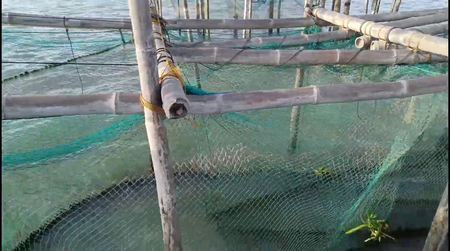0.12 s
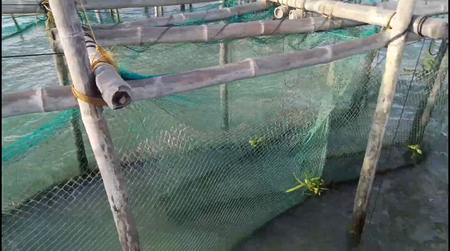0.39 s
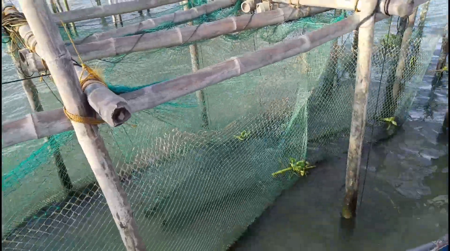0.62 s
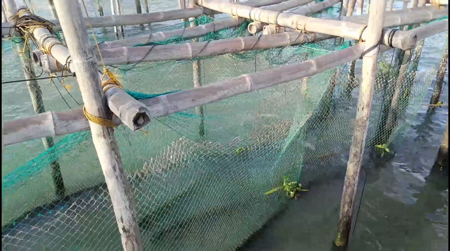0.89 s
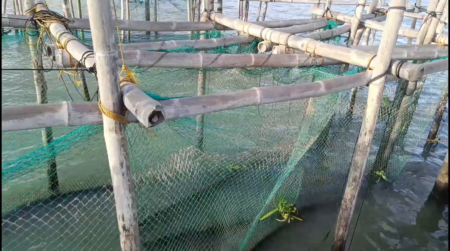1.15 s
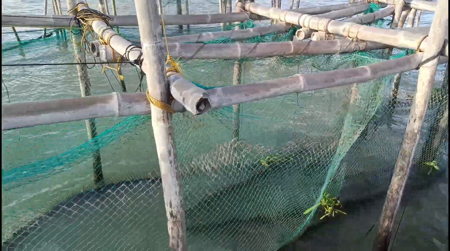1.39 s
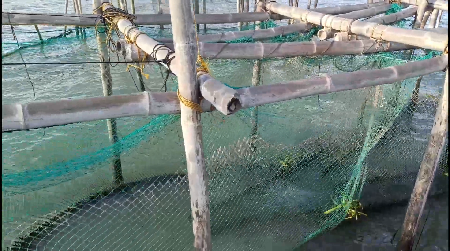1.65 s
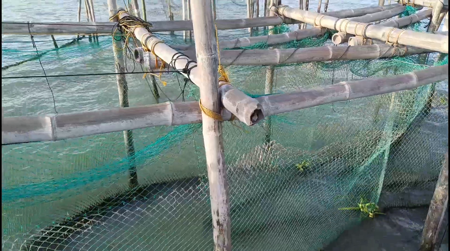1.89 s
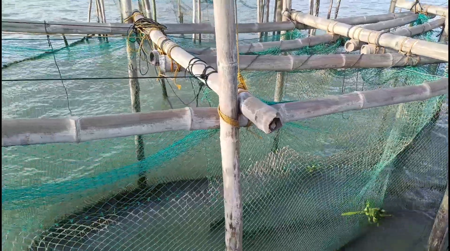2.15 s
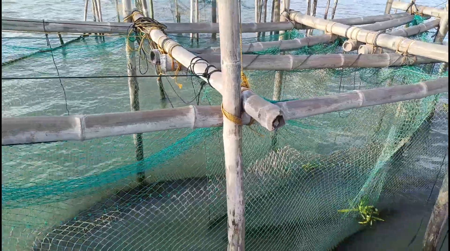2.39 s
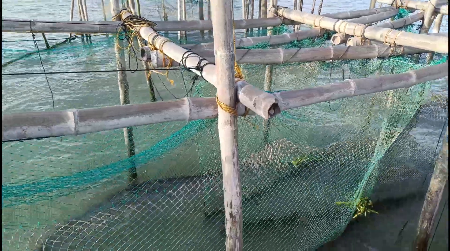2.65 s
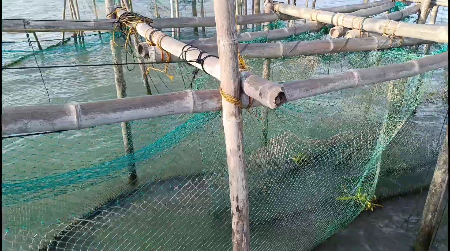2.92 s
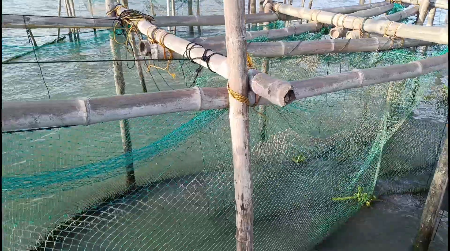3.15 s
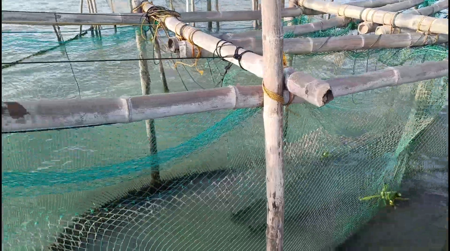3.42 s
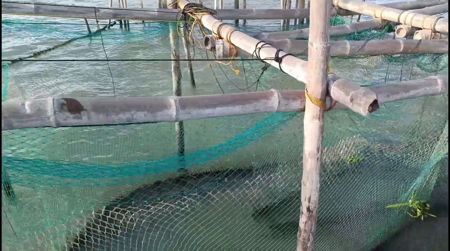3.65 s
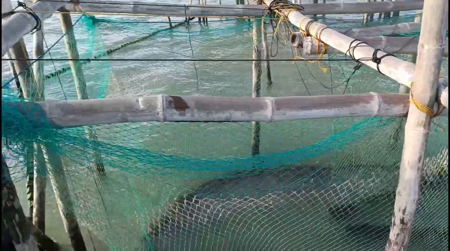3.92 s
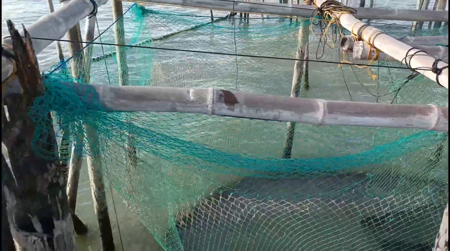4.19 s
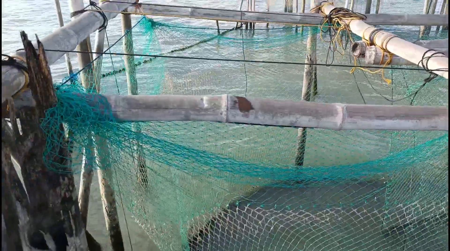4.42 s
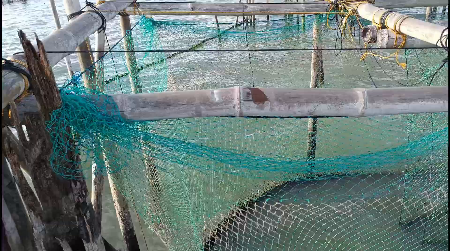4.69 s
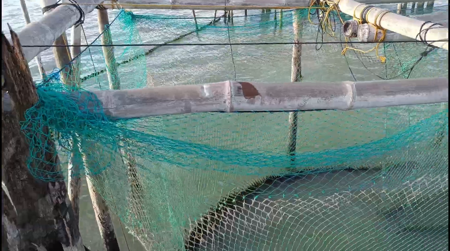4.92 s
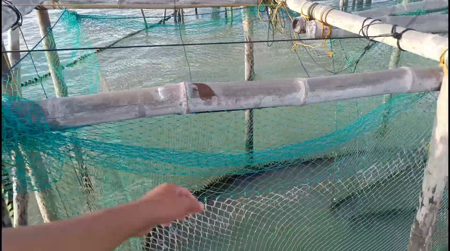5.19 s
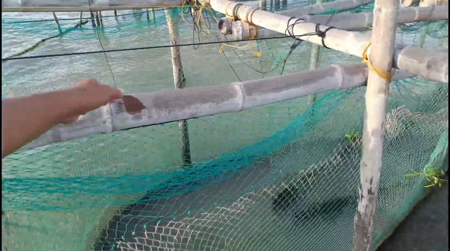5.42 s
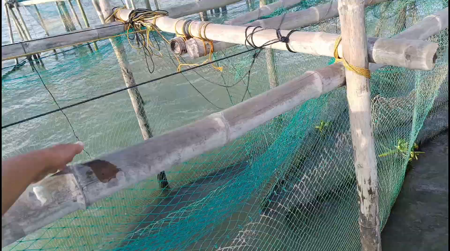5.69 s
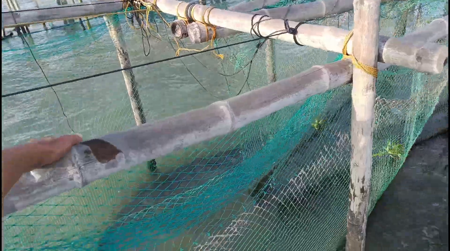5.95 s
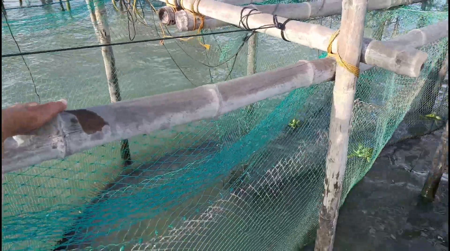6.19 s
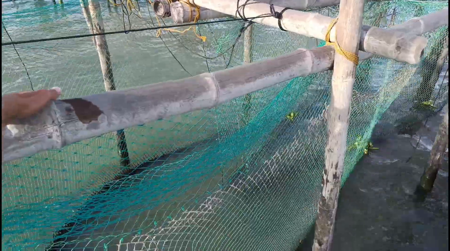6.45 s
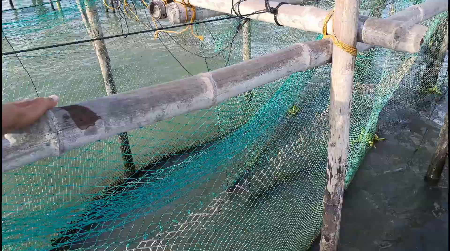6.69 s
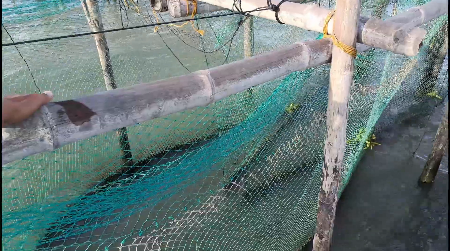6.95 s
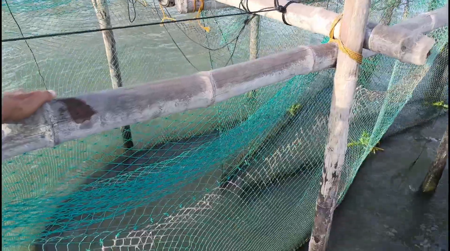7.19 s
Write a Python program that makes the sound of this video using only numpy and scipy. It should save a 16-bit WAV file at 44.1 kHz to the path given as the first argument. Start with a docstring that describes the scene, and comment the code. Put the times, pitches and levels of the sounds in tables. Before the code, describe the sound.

Soft sloshing and bubbling grows into busy splashes and hard hollow knocks on a small hull, with wind buffeting a hand-held phone.

```python
"""Water around a moored boat

Water sloshes, sprays and slaps around a small boat tied among bamboo poles: shaped noise and damped bubble tones.
Gear knocks on the hull and a loose steel fitting rings, both as sums of decaying modes; rubs are comb-filtered hiss.
Wind buffets the two microphone ports of a hand-held phone, the left one more, as low noise unrelated between ports.
Behind it lies the even wash of the open lake. Short, ever changing echoes surround the knocks and splashes."""
import sys
import numpy as np
from scipy import signal
from scipy.fft import rfft, irfft, next_fast_len
from scipy.io import wavfile
from scipy.ndimage import uniform_filter1d, map_coordinates

SR = 44100
rng = np.random.default_rng(int(sys.argv[2]) if len(sys.argv) > 2 else 0)


def undo_db(level):
    """Turn decibels back into plain size, where 20 dB means ten times bigger."""
    steps = np.asarray(level, float) / 20
    return 10 ** steps


def transcribe(signal):
    """Save signal, clipped to [-1, 1], as a 16-bit WAV file at the path in sys.argv[1]."""
    frames = np.atleast_2d(signal).T
    limited = np.clip(frames, -1, 1)
    pcm = np.round(limited * 32767).astype(np.int16)
    wavfile.write(sys.argv[1], SR, pcm)


N = 323253  # length [samples]

# Levels are source levels, ahead of the echoes and the colour of the ports.
# spells when the water works on the left: (start [s], end [s], lead of the left port [samples])
LEFT_SPELLS = [(.3, .45, 12), (2.55, 2.66, 16), (2.78, 2.92, 12), (3.35, 3.7, 16), (4.75, 5.03, 12),
               (5.37, 5.95, 17), (6.5, 6.6, 13), (6.6, 7.1, 10)]
# wavelets working against hull and poles: (start [s], hold [s], slosh level [dB], spray level [dB])
SURGES = [(.0, 0.13, -64, -68.5), (0.366, 0.063, -54, -58.5), (0.54, 0.0077, -83, -65),
          (1.06, 0.03, -66, -68), (1.17, 0.099, -55, -57), (1.22, 0.0078, -62, -48),
          (1.374, 0.056, -53.5, -53), (1.44, 0.34, -65, -69), (2.297, 0.097, -60.5, -67),
          (2.492, 0.0093, -54.5, -63), (2.637, 0.041, -51, -39), (2.712, 0.11, -47.5, -47),
          (2.838, 0.014, -37.5, -50), (2.9, 0.052, -58, -59.5), (2.97, 0.055, -47.5, -49),
          (3.163, 0.035, -50.5, -55), (3.406, 0.048, -60.5, -53), (3.476, 0.2, -61, -55),
          (3.636, 0.15, -55.5, -62), (4.218, 0.026, -56.5, -61), (4.277, 0.069, -69, -52),
          (4.383, 0.13, -48, -48.5), (4.533, 0.028, -32, -26.5), (4.63, 0.024, -31, -46),
          (4.788, 0.0082, -35.5, -35.5), (4.875, 0.017, -39.5, -41), (4.933, 0.019, -59, -38),
          (5.015, 0.026, -36.5, -44), (5.132, 0.28, -47.5, -48), (5.403, 0.012, -33, -45),
          (5.475, 0.013, -28, -38), (5.558, 0.064, -38.5, -45.5), (5.608, 0.016, -39, -37.5),
          (5.709, 0.14, -45.5, -54), (5.918, 0.73, -60.5, -62.5), (6.466, 0.014, -47.5, -65),
          (6.51, 0.054, -63, -45), (6.622, 0.014, -34.5, -73), (6.854, 0.092, -57.5, -63),
          (6.994, 0.012, -51.5, -53.5), (7.12, 0.0075, -54.5, -64.5)]
CALM_SLOSH_DB, CALM_SPRAY_DB = -71.5, -69  # lapping that never stops
SURGE_RISE_DB_S, SURGE_FALL_DB_S = 398.5, 231
# left over right [dB]: water on the right, on the left
SPRAY_PAN_DB, SLAP_PAN_DB = (3.5, 4.5), (0.5, 3.5)
# spectral shape of the slosh: (frequency [Hz], relative level [dB])
SLOSH_SPECTRUM = [(120, -23.5), (200, -8), (247, -8.5), (318, -4), (600, -7.5), (1030, -6.5), (1410, -6),
                  (1680, -10), (2400, -12), (3000, -35), (4000, -27.5), (5200, -16), (8800, -120)]
# spectral shape of the spray: (frequency [Hz], relative level [dB])
SPRAY_SPECTRUM = [(1500, -3.5), (2500, 1), (3200, 3), (5000, -4), (8000, 2), (12000, 0), (15500, 3),
                  (15800, -33), (16800, -46.5)]
# slaps and knocks: (time [s], level [dB], body [Hz], relative treble [dB], 60 dB decay before limits [s])
SLAPS = [(.224, -49.5, 523, -9, 0.11), (0.326, -43, 1160, -35, 0.058), (1.164, -39, 1090, 0, 0.062),
         (1.285, -45, 570, -4.5, 0.15), (1.451, -36.5, 1680, -15.5, 0.11), (1.587, -43.5, 980, -28, 0.1),
         (1.689, -48, 1980, -5.5, 0.24), (1.723, -49, 480, -6.5, 0.36), (2.101, -25.5, 1690, -48, 0.21),
         (2.125, -22.5, 450, -38, 0.19), (2.146, -30, 2600, -8.5, .12), (2.306, -44, 2100, -13, 0.084),
         (2.475, -42.5, 473, -7, 0.089), (2.538, -43.5, 1860, 1, 0.55), (2.783, -35.5, 1020, -4, 0.047),
         (2.839, -39.5, 460, -30, 0.54), (2.948, -41, 990, -28, 0.38), (3.075, -41.5, 1960, -6, 0.15),
         (3.13, -43, 1320, -11, 0.3), (3.387, -46.5, 1270, 0.5, 0.031), (3.741, -51, 1040, -37, 0.1),
         (3.969, -52, 770, -32, 0.092), (4.25, -41, 656, -9.5, 0.39), (4.384, -36, 690, -20, 0.24),
         (4.466, -22, 1780, -3, .06), (4.474, -16, 1800, 4, 0.076), (4.528, -19.5, 526, 1, 0.068),
         (4.625, -20, 1130, -6.5, 0.17), (4.769, -22.5, 990, 2.5, 0.025), (4.818, -33.5, 1060, -25.5, 0.18),
         (4.888, -26, 570, -11, 0.1), (4.987, -51, 467, 3, 0.041), (5.008, -20, 780, -17, 0.044),
         (5.125, -40, 829, -11, 0.023), (5.145, -48.5, 520, 8, 0.052), (5.231, -27.5, 1240, -3.5, 0.03),
         (5.255, -31.5, 2000, 1, 0.13), (5.38, -22, 1024, -16, 0.22), (5.558, -24.5, 590, -3, 0.018),
         (5.603, -25.5, 1510, -10, 0.054), (5.624, -16, 595, -6, 0.02), (5.658, -25.5, 1580, -12, 0.026),
         (5.747, -27.5, 1510, -9, 0.066), (5.816, -22.5, 1400, -14, 0.023), (5.851, -25, 450, -3, 0.013),
         (6.095, -39, 477, -9, 0.07), (6.104, -25.5, 464, -22.5, 0.018), (6.333, -39.5, 434, -7.5, 0.044),
         (6.372, -33.5, 617, -9, .15), (6.387, -23, 442, -17.5, 0.18), (6.494, -36, 450, -12.5, 0.16),
         (6.547, -9.5, 910, 1, 0.066), (6.621, -7, 1130, -18.5, 0.058), (6.878, -56, 450, -2, 0.06),
         (6.964, -42, 558, -25, 0.13), (7.013, -39.5, 762, 1, 0.061)]
# single large bubbles, and one thin high squeak:
# (time [s], level [dB], initial pitch [Hz], 60 dB decay before limits [s])
PLOPS = [(0.222, -45.5, 462, 0.059), (0.399, -45.5, 370, 0.11), (1.663, -26, 1207, 0.09),
         (1.71, -32.5, 497, 0.15), (1.744, -29.5, 462, 0.05), (1.754, -43, 613, 0.1),
         (2.138, -25, 500, 0.046), (2.165, -22, 342, 0.064), (2.19, -30, 305, 0.083),
         (2.59, -29.5, 295, 0.1), (2.81, -23, 404, 0.046), (2.859, -30, 330, 0.1),
         (2.965, -24.5, 1110, 0.04), (3.19, -31.5, 383, 0.062), (4.395, -29.5, 278, 0.22),
         (4.42, -34, 248, 0.058), (4.638, -13.5, 443, 0.068), (5.011, -15, 352, 0.062),
         (6.338, -20.5, 338, 0.033), (6.6212, -5, 962, 0.069), (6.6212, -8, 1080, 0.064),
         (6.371, -13, 366, 0.028), (0.051, -39.5, 470, 0.046), (.325, -51, 1090, 0.045),
         (1.18, -45, 1040, 0.036), (1.38, -39, 1210, .04), (1.84, -40, 480, 0.043),
         (2.625, -24.5, 383, 0.024), (2.915, -33, 330, 0.056), (7.09, -45.5, 616, 0.092),
         (7.285, -41.5, 592, 0.073), (3.253, -30, 1350, 0.034), (3.742, -21.5, 880, 0.042),
         (4.188, -30, 1125, 0.17), (4.384, -31.5, 316, 0.13), (5.623, -9, 626, 0.033),
         (5.853, -14.5, 415, 0.045), (6.564, -9.5, 388, 0.038), (6.579, -24, 453, 0.13),
         (6.82, -27.5, 450, 0.058), (1.0625, -50.5, 2570, 0.15), (1.2521, -48, 2000, 0.11),
         (1.4596, -37, 1900, 0.057), (1.6891, -35.5, 2150, 0.038), (2.0423, -39, 1780, 0.079),
         (2.2717, -39.5, 1620, 0.078), (4.7162, -25, 1540, 0.22), (4.9641, -20.5, 2040, 0.04),
         (5.0569, -21.5, 2140, 0.025), (5.4144, -27, 1690, 0.03), (6.5485, 1, 2310, 0.017),
         (6.8763, -30, 2080, 0.049), (3.6631, -37, 4430, 0.1), (.128, -42.5, 1780, .04),
         (.162, -48, 1700, .03), (.203, -47, 1300, 0.066), (.315, -41, 2250, 0.1), (.385, -53, 865, 0.055),
         (.41, -40, 1130, 0.063), (.832, -42, 1040, 0.04), (.89, -43, 1110, 0.054), (1.0, -46, 1680, .03),
         (1.755, -42, 1730, 0.085), (2.65, -42, 1040, .06), (2.705, -29, 1050, 0.073),
         (2.843, -27, 547, 0.044), (2.868, -30.5, 638, 0.077), (2.995, -22, 1130, 0.048),
         (3.075, -37, 1880, .04), (4.822, -21, 1117, 0.076), (5.01, -10.5, 2260, 0.022)]
# spray ticks: (time [s], level [dB], centre [Hz], left over right [dB])
TICKS = [(0.702, -54, 5150, -26), (1.1635, -38, 8400, -21), (1.216, -33, 9580, 18),
         (2.1247, -22.5, 3300, -9), (2.148, -21, 3700, 1), (6.5472, -11.5, 3430, 2.5),
         (6.621, -8.5, 3100, 7), (2.1455, -20.5, 6400, -1), (2.307, -44.5, 9700, 19),
         (3.4127, -30, 9400, 13), (4.286, -28.5, 8400, -1), (4.469, -5, 7600, 5), (4.633, -21, 2370, -6),
         (1.925, -58, 7000, -1), (2.7, -46, 13000, -5), (4.767, -22.5, 9300, 22), (5.0323, -32, 9480, 3),
         (5.048, -25.5, 9150, 6), (5.1279, -36, 9600, 16), (5.227, -25, 9860, 1), (5.2562, -37, 5240, -31),
         (5.322, -24, 8450, 7), (5.3903, -32, 8670, 18), (5.413, -19.5, 9400, 6), (5.4723, -21.5, 8900, -6),
         (5.571, -27, 9160, 5), (5.622, -14, 9800, 17), (5.71, -28.5, 9800, 13), (5.817, -52, 5290, -19),
         (5.849, -26, 10300, 19.5), (5.97, -35, 8300, 14.5), (6.105, -33, 9700, 6),
         (6.4825, -30, 5300, 0.5), (6.509, -26.5, 9600, 16), (6.546, -6, 8970, 9.5), (6.62, -15, 9350, 12),
         (6.9043, -32, 7300, 8.5), (7.014, -26.5, 9700, -3), (0.5054, -43.5, 4340, -3),
         (6.9045, -31, 3320, 17), (0.174, -45.5, 4100, 2), (0.55, -44.5, 5170, -10),
         (.658, -53, 4700, -2.5), (1.164, -32.5, 4500, -4), (2.32, -43, 7000, 3), (2.366, -44, 7140, 20),
         (5.413, -25, 3100, -18), (5.8515, -29, 3750, 12), (5.6235, -12, 4740, 6)]
# dry raps of gear on the hull: (time [s], level [dB])
RAPS = [(1.664, -33), (4.633, -20), (4.7685, -12.5), (4.822, -15.5), (4.888, -22), (5.0097, -18),
        (5.3815, -26), (5.5585, -17.5), (5.602, -17), (5.6235, -4), (5.658, -9.5), (5.749, -11),
        (5.8185, -7.5), (6.105, -19)]
# modes of the hull's short answer, before random spread: (frequency [Hz], level [dB], 60 dB decay [s])
HULL_MODES = [(740, -12, 0.016), (1117, 3, 0.011), (1536, 6, 0.0092), (2000, -22, 0.0065),
              (5440, -14, 0.0068)]
# blows on the steel fitting: (time [s], level [dB], relative mount tone [dB])
CLINKS = [(4.471, -11, 2), (4.493, -21.5, -20), (4.583, -33, -21), (4.627, -30, -20), (4.701, -47, -29),
          (4.786, -27, -5), (4.887, -29.5, -1), (4.988, -34, -1), (5.146, -33.5, -9), (5.187, -50, -14),
          (5.2566, -23.5, -28), (5.385, -36, -20), (5.44, -37, -20)]
# modes of the fitting, before random spread: (frequency [Hz], level [dB], 60 dB decay [s])
STEEL_MODES = [(4431, 0, .25), (4488, -7, .12), (4580, -12, .06), (6785, -12, .1), (7760, -13, .06),
               (12161, -16, .2)]
# brushing strokes: (start [s], length [s], level [dB], centre [Hz], band spacing [Hz], left over right [dB])
RUBS = [(2.452, 0.33, -36, 5560, 1580, -1.5), (3.591, 0.11, -45, 12800, 1250, 26),
        (3.693, 0.077, -59.5, 9500, 1350, 29)]
# puffs on the ports: (time [s], level [dB], initial swing [Hz], left over right [dB])
THUMPS = [(3.552, -15.5, 79, 37), (3.584, -7.5, 131, 31), (3.602, -10, 75.6, 37), (4.898, -8.5, 116, 30),
          (4.971, -2, 116, 30), (5.028, -11, 113, 6), (5.867, -14, 52, 30), (6.101, -4, 159, 30),
          (6.133, -9.5, 64.5, 36.5), (6.371, -20, 50.8, 28)]
# gusts: (start [s], hold [s], roll level [dB], flutter over roll [dB], left over right [dB])
GUSTS = [(0.074, 0.018, -61.5, 8, 2), (0.335, 0.13, -41.5, -16, 12), (0.714, 0.026, -43, -15, -2),
         (0.864, 0.009, -42, -11.5, 13), (1.17, 0.009, -38, -15, 9), (1.277, 0.026, -39.5, -16, 2),
         (1.399, 0.0052, -36, -33, 24), (1.706, 0.3, -49, -43, 4.5), (2.178, 0.045, -38, -1, 8.5),
         (2.25, 0.076, -37, -19, -5), (2.408, 0.15, -43.5, -21, 22), (2.623, 0.058, -36.5, -8.5, 16),
         (2.854, 0.17, -51, 6.5, -2), (3.41, 0.14, -46, -10, 14), (3.586, 0.014, -24.5, -9, 31),
         (3.707, 0.17, -53.5, 2.5, 0), (4.083, 0.39, -45.5, -13, 2), (4.313, 0.014, -33.5, -4.5, -4.5),
         (4.418, 0.017, -45.5, 7, -14), (4.519, 0.011, -26, -14, -25), (4.684, 0.0092, -34.5, -4, -13),
         (4.793, 0.028, -30.5, -20, 6.5), (4.897, 0.037, -29.5, -12, 9), (4.999, 0.0069, -23.5, -0.5, 22),
         (5.147, 0.18, -37, -32, 4.5), (5.334, 0.17, -45.5, -2, -1.5), (5.555, 0.02, -30.5, -25, 3.5),
         (5.694, 0.18, -30.5, -9, 21), (5.968, 0.13, -32.5, -5, 24), (6.121, 0.01, -23, -8, 31),
         (6.342, 0.07, -30, -3.5, 26), (6.581, 0.012, -38.5, 6.5, 11), (6.81, 0.17, -38.5, -4, 22),
         (7.072, 0.3, -73, -13.5, 20.5)]
CALM_ROLL_DB, CALM_FLUTTER_DB = -58.5, -61.5  # between gusts
GUST_RISE_DB_S, GUST_FALL_DB_S = 315.5, 230.5
# spectral shape of the deep wind roll: (frequency [Hz], relative level [dB])
ROLL_SPECTRUM = [(13, -26.5), (22, -1.5), (48, 1.5), (92, -2.5), (130, -12.5), (170, -31), (290, -120)]
# spectral shape of the quicker wind flutter: (frequency [Hz], relative level [dB])
FLUTTER_SPECTRUM = [(59, -35), (100, -0.5), (146, 2.5), (254, -8), (450, -16), (580, -38.5), (990, -120)]
# spectral shape of the wash of the open lake: (frequency [Hz], relative level [dB])
FAR_WATER_SPECTRUM = [(250, -12.5), (500, -16), (1000, 2), (2000, 3), (2600, -3.5), (3200, -5.5),
                      (5000, -8), (9000, -21), (15000, -25)]
# colour of the left port, then of the right: (frequency [Hz], gain [dB])
PORTS = [
    [(300, 4), (2600, -4), (3250, -7.5), (3900, -3.5), (5000, -9), (6200, -8.5), (6900, -46.5),
     (7500, -12.5), (9600, 1), (11200, -9.5), (13000, -6), (14500, -25.5), (15800, -33)],
    [(300, 2), (2600, -3.5), (3250, -3), (4000, -2), (8000, 0.5), (9400, -3), (10200, -38), (11000, -20.5),
     (12000, -1.5), (15400, -6.5), (15800, -23.5), (16800, -29.5)],
]


def unit(x):
    """Normalization: scale to rms 1."""
    return x / np.sqrt(np.mean(x ** 2, axis=-1, keepdims=True) + 1e-20)


def along(points, hz):
    """Interpolation of (frequency, value) points on a logarithmic frequency axis."""
    f, v = np.transpose(points)
    return np.interp(np.log(hz + 1), np.log(f + 1), v)


def curves(calm_db, start, hold, db, rise, fall):
    """Power summation of swells over a calm level: each climbs, holds, then dies away at constant dB/s."""
    t = np.arange(0, N + 64, 64) / SR
    before = np.clip(start - t, 0, None)
    after = np.clip(t - start - np.abs(hold), 0, None)
    shape = db - rise * before - fall * after
    power = undo_db(2 * calm_db) + undo_db(2 * shape).sum(axis=0)
    return np.interp(np.arange(N) / SR, t, np.sqrt(power))


def wobble(rate):
    """Slow random modulation: a smooth curve through rate random knots a second."""
    knots = rng.standard_normal(int(N * rate / SR) + 4)
    return map_coordinates(knots, [np.arange(N) * rate / SR])


def smooth_noise(shape, width):
    """Low-passed noise: a running mean over width samples, rms 1."""
    return unit(uniform_filter1d(rng.standard_normal(shape), width))


def filtered(x, response):
    """Linear filtering: the spectrum of x times a response of frequency."""
    m = next_fast_len(x.shape[-1] + 4096)
    return irfft(rfft(x, m) * response(np.fft.rfftfreq(m, 1 / SR)), m)[..., :x.shape[-1]]


def rush(spectrum, patchy_db, size=512):
    """Turbulence as shaped noise of rms 1, with time-frequency patches of random gain."""
    z = signal.stft(rng.standard_normal(N + size), nperseg=size)[2]
    field = uniform_filter1d(uniform_filter1d(rng.standard_normal(z.shape), 4, 0), 4, 1)
    noise = signal.istft(z * undo_db(patchy_db * field / field.std()), nperseg=size)[1][:N]
    return unit(filtered(noise, lambda hz: undo_db(along(spectrum, hz))))


def bursts(hz, sharp, length):
    """Resonance: one noise burst a row, coloured by a steep-sided band-pass, rms 1."""
    noise = rng.standard_normal((len(hz), length))

    def resonance(f):
        damping = (f * hz / sharp) ** 2
        return damping / ((hz * hz - f * f) ** 2 + damping)

    return unit(filtered(noise, resonance))


def bubble(hz, t60, t, glide):
    """Damped oscillation: a decaying sine; its pitch rises for glide above 0, as a bubble nears the surface."""
    phase = 2 * np.pi * hz * t * (1 + glide * t / t60)
    return np.sin(phase) * undo_db(-60 * t / t60) * (1 - np.exp(-t * hz / 1.2))


def laid(rows, start):
    """Superposition: sum short sounds, one a row, at their start samples."""
    at = np.clip(start[:, None] + np.arange(rows.shape[1]), 0, N)
    return np.bincount(at.ravel(), rows.ravel(), N + 1)[:N]


def grains(count, mid_hz, spread, cycles, size_db):
    """Superposed bubble resonances: a swarm of small bubbles of random size, rms 1."""
    draw = rng.random((count, 2))
    hz = np.clip(mid_hz * np.exp(spread * rng.standard_normal((count, 1))), 200, 15000)
    t = np.arange(min(int(3e6 / count), SR // 10)) / SR
    loudness = undo_db(-size_db * np.log(1.01 - draw[:, :1]))
    rows = bubble(hz, cycles / hz, t, glide=.35) * loudness
    return unit(laid(rows, (draw[:, 1] * N).astype(int)))


def on_left(s):
    """Source position: 1 while the water works to the left of the phone, else 0."""
    return sum((s > start) & (s < end) for start, end, lead in LEFT_SPELLS)


def placed(rows, s, pan_db, left):
    """Arrival-time difference: the left port leads for sounds on the left, else lags; pan_db is the level ratio."""
    start = np.round(s * SR).astype(int)
    lead = sum(k * ((s > a) & (s < b)) for a, b, k in LEFT_SPELLS)
    lag = np.where(left, -np.where(lead, lead, 12), 19)  # samples
    return np.array([laid(rows * undo_db(pan_db / 2), start + lag), laid(rows * undo_db(-pan_db / 2), start)])


def sides(make, left_share, loose):
    """Spatial coherence: water to the left, water to the right, and a diffuse part unrelated between the ports."""
    left, right = np.sqrt(left_share) * make(), np.sqrt(1 - left_share) * make()
    # each side reaches the opposite port some samples late
    pair = np.array([left + np.roll(right, 19), np.roll(left, 13) + right])
    return np.sqrt(1 - loose) * pair + np.sqrt(loose) * np.array([make(), make()])


def water():
    """Turbulence and bubble resonance: slosh with gurgling bubbles below, fine spray hiss with fizz above."""
    s, hold, slosh_db, spray_db = np.transpose(SURGES)[..., None]

    def level(calm_db, db):
        return curves(calm_db, s, hold, db, SURGE_RISE_DB_S, SURGE_FALL_DB_S)

    def gurgling_slosh():
        gurgle = grains(count=1800, mid_hz=1100, spread=.5, cycles=30, size_db=4)
        return rush(SLOSH_SPECTRUM, patchy_db=4.5) + 1.4 * gurgle

    def fizzing_spray():
        fizz = grains(count=4000, mid_hz=7500, spread=.35, cycles=4, size_db=3.5)
        return rush(SPRAY_SPECTRUM, patchy_db=3.6) + .5 * fizz

    left_share = .15 + .7 * uniform_filter1d(1. * on_left(np.arange(N) / SR), SR // 20)
    pan_db = np.interp(left_share, (.15, .85), SPRAY_PAN_DB) + 4 * wobble(12)
    surge = wobble(22)
    slosh = sides(gurgling_slosh, left_share, loose=.35)
    slosh = slosh * level(CALM_SLOSH_DB, slosh_db) * undo_db(2 * surge)
    spray = sides(fizzing_spray, left_share / 2, loose=.7)
    flicker_db = 2.8 * surge + 2 * wobble(45)
    spray_gain = undo_db(pan_db * [[.5], [-.5]] + flicker_db)
    return slosh + spray * level(CALM_SPRAY_DB, spray_db) * spray_gain


def slaps():
    """Impact of water: a crack, a hollow body tone in noise, a brighter splash and a spattering tail."""
    s, db, hz, treble_db, t60 = np.transpose(SLAPS)[..., None]
    left = on_left(s)
    pan_db = np.where(left, SLAP_PAN_DB[1], SLAP_PAN_DB[0])
    t, t60 = np.arange(SR // 4) / SR, np.clip(t60, .015, .4)
    fade = undo_db(-60 * t / t60)
    spatter = 0.31 * undo_db(-60 * t / 0.22) * undo_db(4 * smooth_noise((len(s), len(t)), 200) - 2)
    crack = 0.16 * bursts(0 * hz + 1900, 0.32, len(t)) * undo_db(-60 * t / 0.022)
    hollow = bursts(hz, 3.2, len(t)) * fade
    body = hollow + 0.68 * bursts(0 * hz + 1200, 0.89, len(t)) * (fade + spatter)
    # a bounce off the hull bands each splash in its own way
    echo_s = rng.uniform(.0005, .002, s.shape)
    bright = bursts(0 * hz + 7000, 0.64, len(t))
    banded = filtered(bright, lambda f: 1 / (1 - .35 * np.exp(-2j * np.pi * f * echo_s)))
    splash = unit(banded) * undo_db(treble_db) * (fade + spatter) * (1 - np.exp(-t / 0.0027))
    # longer slaps rise more slowly, up to a limit
    onset = 1 - np.exp(-t / np.minimum(0.015 * t60, .0025))
    return placed(undo_db(db) * onset * (crack + body + splash), s[:, 0], pan_db, left[:, 0])


def plops():
    """Damped resonance: large bubbles and one thin high squeak ring clearly; higher pitches waver more."""
    s, db, hz, t60 = np.transpose(PLOPS)[..., None]
    t = np.arange(SR // 4) / SR
    noise = rng.standard_normal((len(s), len(t)))
    waver = unit(uniform_filter1d(uniform_filter1d(noise, 300), 300))
    drift = 9e-5 * (waver - waver[:, :1]) * np.clip(t / .004, 0, 1)  # s
    rows = undo_db(db) * bubble(hz, np.clip(t60, .02, .3), t + drift, glide=0.04)
    return placed(rows, s[:, 0], 0.95, on_left(s[:, 0]))


def ticks():
    """Impact of drops that land close: a few milliseconds of bright resonant noise."""
    s, db, hz, pan_db = np.transpose(TICKS)[..., None]
    t = np.arange(SR // 20) / SR
    envelope = undo_db(db - 60 * t / 0.015) * (1 - np.exp(-t / 0.00068))
    return placed(envelope * bursts(hz, 1.5, len(t)), s[:, 0], pan_db, pan_db[:, 0] > 0)


def raps():
    """Modal synthesis of hard little knocks: a few hull modes that die within milliseconds."""
    s, db = np.transpose(RAPS)[..., None]
    t = np.arange(SR // 20) / SR
    draw = rng.standard_normal((len(s), len(HULL_MODES)))
    ring = 0
    for k, (hz, level, t60) in enumerate(HULL_MODES):
        detuned_hz = hz * (1 + .025 * draw[:, [k - 1]])
        ring = ring + undo_db(level + draw[:, [k]] - 60 * t / t60) * np.sin(2 * np.pi * detuned_hz * t)
    onset = 1 - np.exp(-t / 0.00076)
    return placed(undo_db(db) * onset * ring, s[:, 0], 1, on_left(s[:, 0]))


def fitting():
    """Modal synthesis: the steel part to the right rattles as it rings; close modes beat over a dull mount tone."""
    s, db, mount_db = np.transpose(CLINKS)[..., None]
    t = np.arange(SR // 2) / SR

    def shake():
        return smooth_noise((len(s), len(t)), 400)

    draw = rng.standard_normal((len(s), len(STEEL_MODES)))
    ring = 0
    for k, (hz, level, t60) in enumerate(STEEL_MODES):
        fade = undo_db(level + 2 * draw[:, [k]] - 60 * t / t60)
        ring = ring + fade * np.sin(2 * np.pi * hz * t + .8 * shake())
    rattle = undo_db(4.5 * np.clip(shake(), -3, 1) - 3)
    mount = undo_db(mount_db - 60 * t / 0.11) * np.sin(2 * np.pi * 1812 * t + 0.89 * shake())
    onset = 1 - np.exp(-t / 0.0011)
    return placed(undo_db(db) * onset * (ring * rattle + mount), s[:, 0], -2.5, False)


def rubs():
    """Friction along netting or cloth: hiss comb-filtered by two very short echoes, brightening over the stroke."""
    s, length, db, hz, band_hz, pan_db = np.transpose(RUBS)[..., None]
    t = np.arange(SR // 2) / SR

    def comb(f, spacing, depth):
        return 1 / (1 - depth * np.exp(-2j * np.pi * f / spacing))

    def bands(f):
        low_pass = 1 / (1 + (f / hz / 1.9) ** 6)
        return comb(f, band_hz, .5) * low_pass * comb(f, .58 * band_hz, .25)

    progress = np.clip(t / length, 0, 1)
    turn = np.pi / 2 * progress
    dark, bright = bursts(.75 * hz, 1.1, len(t)), bursts(1.35 * hz, 1.3, len(t))
    hiss = np.cos(turn) * dark + np.sin(turn) * bright
    stroke = np.sin(np.pi * progress) ** 2.1
    return placed(undo_db(db) * stroke * unit(filtered(hiss, bands)), s[:, 0], pan_db, pan_db[:, 0] > 0)


def thumps():
    """Damped oscillation: sudden puffs push a port in a few slow swings that slow slightly as they fade."""
    s, db, hz, pan_db = np.transpose(THUMPS)[..., None]
    rows = undo_db(db) * bubble(hz, 3.2 / hz, np.arange(SR // 8) / SR, glide=-0.029)
    return placed(rows, s[:, 0], pan_db, False)


def wind():
    """Turbulent pressure, unrelated from port to port: a lumpy deep roll and a quicker flutter."""
    s, hold, roll_db, flutter_db, pan_db = np.transpose(GUSTS)[..., None]
    # each gust's power is shared between the left and the right port
    share_db = [-10 * np.log10(1 + undo_db(-2 * side * pan_db)) for side in (1, -1)]

    def gusts(calm_db, db):
        return np.array([curves(calm_db, s, hold, db + port_db, GUST_RISE_DB_S, GUST_FALL_DB_S)
                         for port_db in share_db])

    lumps = undo_db(1.44 * np.array([wobble(22), wobble(22)]))
    roll = np.array([rush(ROLL_SPECTRUM, patchy_db=3.0, size=4096) for port in range(2)])
    flutter = np.array([rush(FLUTTER_SPECTRUM, patchy_db=4.5, size=1024) for port in range(2)])
    roll = gusts(CALM_ROLL_DB, roll_db) * roll
    flutter = gusts(CALM_FLUTTER_DB, roll_db + flutter_db) * flutter
    return 2 * unit(lumps) * (roll + flutter)


def far_water():
    """Diffuse field: the even wash of the open lake, steady noise with trickling bubbles."""
    def wash():
        trickle = grains(count=250, mid_hz=1400, spread=.35, cycles=70, size_db=3)
        return rush(FAR_WATER_SPECTRUM, patchy_db=4.5) + 1.04 * trickle

    return undo_db(-67.5) * sides(wash, left_share=0.38, loose=0.79)


def scattered(x):
    """Scattering: hull, poles and water return short echoes, unlike at each port and ever changing."""
    t, step = np.arange(SR // 20) / SR, 2048
    parts = np.pad(x, ((0, 0), (0, -N % step))).reshape(2, -1, step)
    # a fresh cloud for every part of step samples
    cloud = rng.standard_normal(parts.shape[:2] + t.shape) * undo_db(-60 * t / 0.013) * (t > .0003)
    # the bass passes the scatterers by
    cloud = unit(filtered(cloud, lambda hz: 1j * hz / (700 + 1j * hz))) / np.sqrt(len(t))
    returned = signal.fftconvolve(parts, cloud, axes=2)
    echoes = np.array([laid(rows, step * np.arange(len(rows))) for rows in returned])
    direct = filtered(x, lambda hz: undo_db(along([(300, -1), (3000, -4)], hz)))
    return direct + undo_db(-3) * echoes


def scene():
    """Superposition: airborne sound takes the colour of each port; wind acts on the ports directly."""
    bubbles = plops() / 2  # bubbles ring out clearly: half as much echo
    echoing = scattered(slaps() + ticks() + bubbles + rubs() + raps())
    air = water() + far_water() + echoing + bubbles + fitting()
    coloured = filtered(air, lambda hz: undo_db([along(port, hz) for port in PORTS]))
    return coloured + wind() + thumps()


def top_cut(x):
    """Nothing passes above the cut-off."""
    return signal.sosfilt(signal.butter(12, 16820, fs=SR, output="sos"), x)


def record(dry):
    """Saturation: a soft ceiling bends the peaks towards full scale."""
    mix = dry / (1 + np.abs(dry) ** 6) ** (1 / 6)
    return top_cut(mix)


dry = scene()
out = record(dry)
transcribe(out)
```